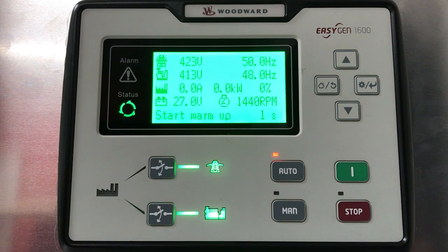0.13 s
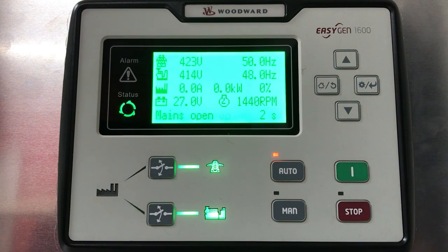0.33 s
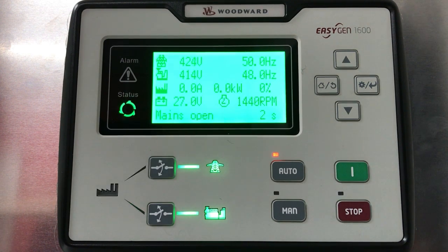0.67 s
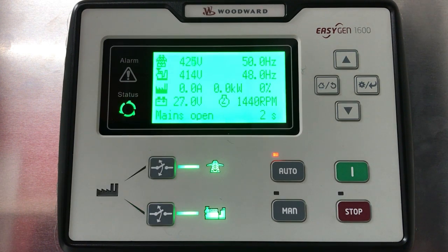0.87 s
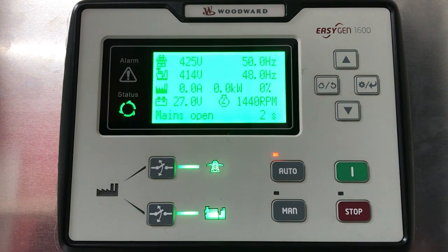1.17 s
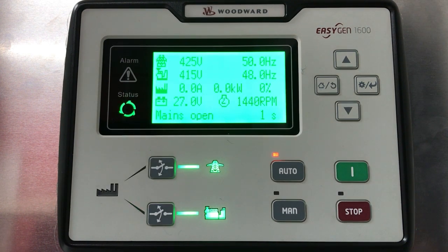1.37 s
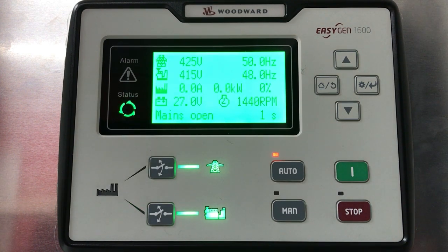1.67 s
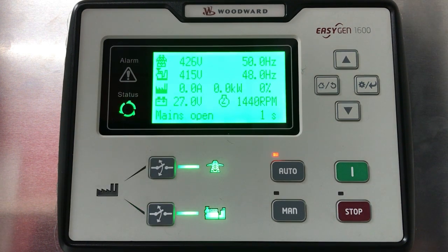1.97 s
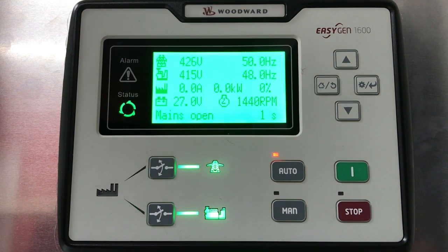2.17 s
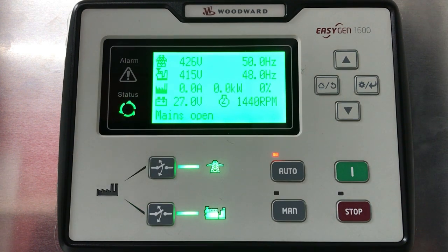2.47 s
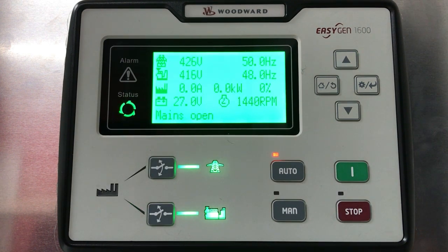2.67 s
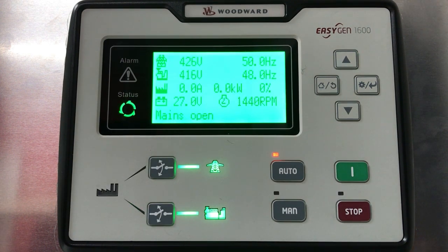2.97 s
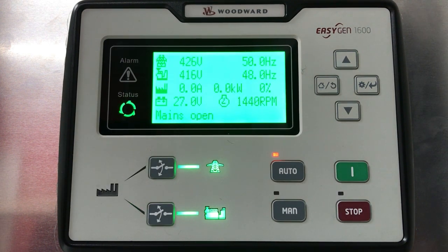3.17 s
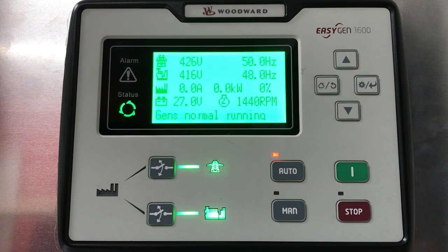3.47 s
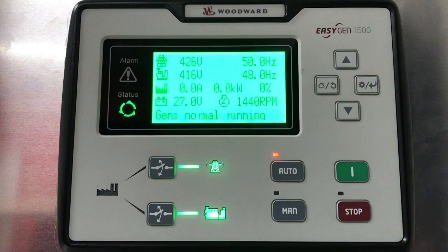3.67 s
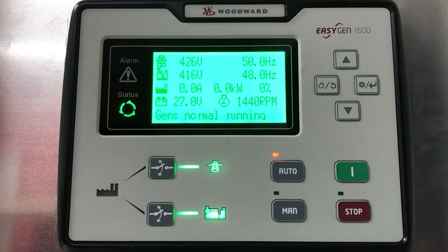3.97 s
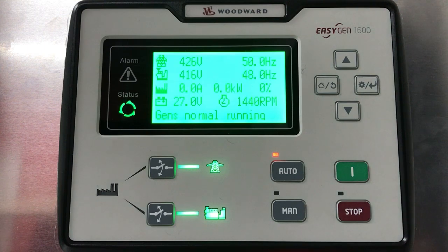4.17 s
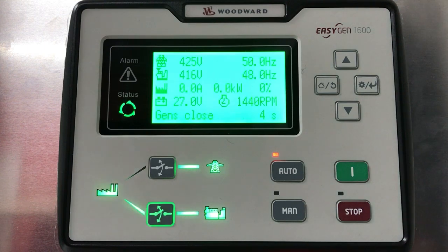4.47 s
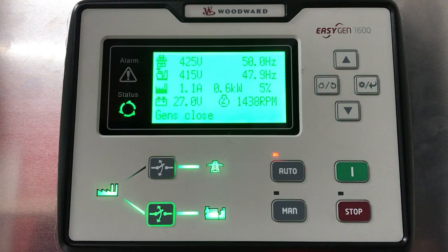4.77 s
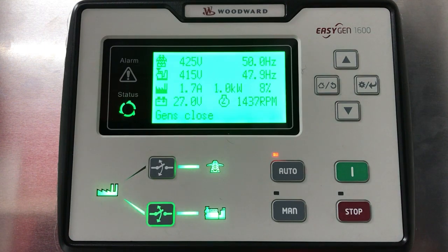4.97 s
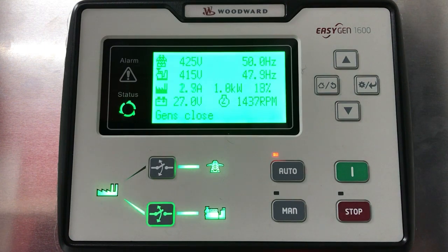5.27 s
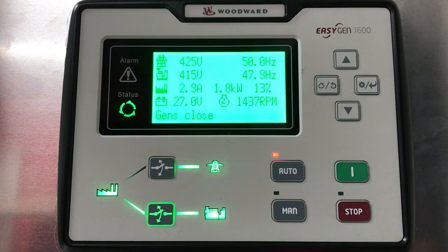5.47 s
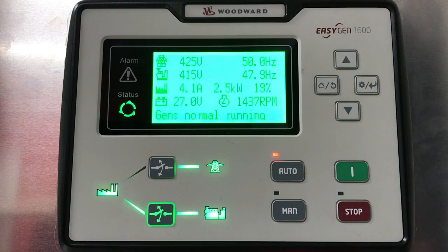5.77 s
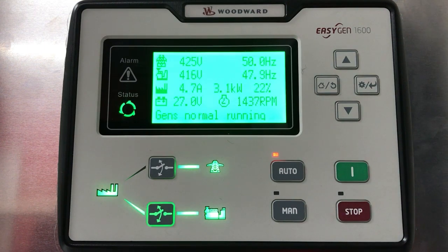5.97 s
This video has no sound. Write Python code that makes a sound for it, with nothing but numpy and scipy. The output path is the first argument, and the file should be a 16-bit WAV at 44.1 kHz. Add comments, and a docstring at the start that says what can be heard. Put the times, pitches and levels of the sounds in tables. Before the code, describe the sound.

Indoors at a test stand, a breaker opens immediately with a quick, rattling cluster of knocks, the loudest event, leaving a low steel-cabinet boom. Close relays tick singly and a contactor releases dully around three seconds, then clacks sharply twice after four. Underneath, generator hum throbs and slowly swells until load comes on, then smooths out. Fan noise and faint whines stay steady; the microphone adds slight hiss.

```python
"""A breaker on an indoor test stand drops out with a clunk: bursts of contact noise excite its damped modes and
low cabinet tones swell and die. A contactor clacks and relays tick by the same modal synthesis.
A generator set hums in sines at the orders of its shaft, which slows and smooths when it takes load.
Steady sines of mains, fan and machines stand over filtered ventilation noise. Diffuse echoes of a steel
housing and a hard room follow every blow."""
import sys
import numpy as np
from scipy import signal
from scipy.fft import rfft, irfft
from scipy.io import wavfile
from scipy.ndimage import uniform_filter1d

SR = 44100
rng = np.random.default_rng(int(sys.argv[2]) if len(sys.argv) > 2 else 0)


def waveform_to_disk(signal):
    """Save audio, clipped to [-1, 1], as 16-bit WAV at the path in sys.argv[1]."""
    frames = np.transpose(np.atleast_2d(signal))
    scaled = np.clip(frames, -1, 1) * 32767
    samples = np.round(scaled).astype(np.int16)
    wavfile.write(sys.argv[1], SR, samples)


def boost_factor(decibels):
    """Convert a level in decibels to a linear amplitude factor."""
    exponent = np.asarray(decibels, float) / 20
    return 10 ** exponent


N = 269451
T = np.arange(N) / SR  # time [s]

# In all blow tables the level is 3 dB above the greatest 3 ms rms; thump and knock are relative to 2.5-5 kHz.
# In all mode tables the level is that of the energy, before a small random spread.

# Blows of the opening breaker: t/s, level/dB, rattle fade/s, thump level/dB, knock level/dB
BREAKER_BLOWS = [(.004, -48, 0.056, -4, -17), (.012, -45, 0.0053, 2, 4), (.0475, -34.5, 0.0049, -3, -9),
                 (.054, -31, 0.0035, -7.5, 5), (.060, -30.5, 0.0088, 4, -3), (.1065, -39, 0.0067, 21, 10)]
# Damped modes of the breaker: f/Hz, level/dB, T60/s
BREAKER_MODES = [(463, -2.5, 0.041), (670, -3.5, 0.015), (895, -11, 0.02), (1256, 4, 0.0073),
                 (2025, 4, 0.0042), (3050, -2.5, 0.0022), (3950, -5, 0.0076), (4500, -16, 0.0087),
                 (6850, -0.5, 0.012)]
# Contact of the breaker: rattle rise/s, treble level/dB, treble loss per thump level [dB/dB]
BREAKER_CONTACT = (0.0033, -13, 0.53)


def breaker():
    """Modal excitation: a train of impacts sets the breaker ringing in its damped modes."""
    return blows(BREAKER_BLOWS, BREAKER_MODES, BREAKER_CONTACT, crack_db=2.7, uneven_db=4.5, scrape_db=-6)


def blows(events, modes, contact, crack_db, uneven_db, scrape_db):
    """Source-filter principle: a noisy contact force, growing from a faint scrape, drives modes and a dry crack."""
    out, size = np.zeros(N), 8192
    t, hz = T[:size], np.fft.rfftfreq(2 * size, 1 / SR)
    mode_hz, mode_db, t60 = np.transpose(modes)[:, :, None]
    rise, bright_db, dulling = contact
    for start_s, level_db, fade, thump_db, knock_db in events:
        # no two blows land alike: the modes shift a little in pitch and share
        detune, share = rng.standard_normal((2, len(modes), 1))
        shifted_hz = mode_hz * (1 + 0.008 * detune)
        gain = boost_factor(mode_db + 2.5 * share - 60 * t / t60) / np.sqrt(t60)
        ring = np.sum(gain * np.sin(2 * np.pi * shifted_hz * t), axis=0)
        ring = ring / np.sqrt(np.sum(ring ** 2))
        body = rfft(ring, 2 * size) + boost_factor(crack_db)  # the flat part is the crack

        scrape = boost_factor(scrape_db * (1.0 - (t / rise) ** 2))
        envelope = np.where(t < rise, scrape, np.exp((rise - t) / fade))
        unevenness = boost_factor(uneven_db * rng.standard_normal(size))
        force = envelope * rng.standard_normal(size) * unevenness

        treble_db = bright_db - dulling * thump_db
        tilt = [(150, thump_db - 20), (320, thump_db), (750, thump_db), (1400, knock_db), (2500, 0), (5000, 0),
                (8000, treble_db), (13000, treble_db), (16000, treble_db - 3)]
        hit = irfft(rfft(force, 2 * size) * body * boost_factor(across(tilt, hz)))[:size]
        peak = np.sqrt(np.max(uniform_filter1d(hit ** 2, size=128)) * 2)
        start = int(start_s * SR)
        out[start:start + size] += (hit * boost_factor(level_db) / peak)[:N - start]
    return out


def across(table, hz):
    """Logarithmic frequency scale: tabulated values are interpolated linearly against log frequency."""
    at, value = np.transpose(table)
    return np.interp(np.log(np.maximum(hz, 1)), np.log(at), value)


# Resonances of cabinet and floor, which take up the breaker's blow:
# f/Hz, start t/s, swell time constant/s, level/dB (before swell and shudder), T60/s
CABINET_MODES = [(267.4, .057, 0.0044, -25.5, 0.27), (247, 0.087, 0.019, -34.5, 0.74),
                 (212.7, .06, 0.0037, -33, 0.56), (186.4, 0.12, 0.0088, -33, 0.41),
                 (327.6, .06, 0.038, -38, 0.75), (108.3, .09, 0.023, -26, 0.74),
                 (99.2, 0.064, 0.055, -33, 0.7), (139, 0.048, 0.0063, -33.5, 0.37),
                 (76.6, 0.0557, 0.035, -38, 1), (48.1, 0.11, 0.044, -27, 0.85)]


def cabinet():
    """Resonance: low panel modes build up after the blow, shudder and decay exponentially."""
    out = 0
    for hz, start, swell, level_db, t60 in CABINET_MODES:
        t = np.maximum(T - start, 0)
        envelope = boost_factor(level_db - 60 * t / t60) * (1 - np.exp(-t / swell))
        shudder = boost_factor(1.7 * walk(22.4))
        out = out + envelope * shudder * np.sin(2 * np.pi * hz * t)
    return out


def walk(rate):
    """Band-limited fluctuation: random values held 1 / rate s and averaged twice; spread near 1."""
    hold = int(SR / rate)
    steps = np.repeat(rng.standard_normal(N // hold + 1), hold)
    return 1.3 * uniform_filter1d(uniform_filter1d(steps, hold), hold)[:N]


# Clacks of the contactor: t/s, level/dB, rattle fade/s, thump level/dB, knock level/dB
CONTACTOR_CLACKS = [(4.1073, -37, 0.0018, -1.5, 11.5), (4.1168, -39.5, .011, -2.5, -21),
                    (4.6343, -38.5, 0.0052, 11.5, 13.5), (4.6508, -43, .01, 1.5, -6)]
# Its slower and duller releases: t/s, level/dB, rattle fade/s, thump level/dB, knock level/dB
CONTACTOR_RELEASES = [(.1652, -40.5, 0.0019, -7, 9.5), (3.0298, -41, 0.0037, .5, 2),
                      (3.039, -52, 0.012, 5, 6)]
# Damped modes of the contactor: f/Hz, level/dB, T60/s
CONTACTOR_MODES = [(289, 5, 0.12), (375, 6.5, 0.15), (442, 3.5, 0.063), (554, -9.5, 0.054),
                   (700, 9.5, 0.053), (818, 7, 0.06), (1580, -25, .008), (1860, 1.5, 0.0044),
                   (2250, 5, 0.0062), (3200, -10, .005), (4280, 7.5, 0.0037), (6020, -5, 0.018),
                   (7200, 8.5, 0.0043), (12600, -27, 0.0032)]
# Contact in clack and in release: rattle rise/s, treble level/dB, treble loss per thump level [dB/dB]
CLACK_CONTACT = (0.0017, -1, 0.016)
RELEASE_CONTACT = (0.0038, -3, 0.23)


def contactor():
    """Modal excitation: clacks and duller releases ring the same set of damped modes."""
    clacks = blows(CONTACTOR_CLACKS, CONTACTOR_MODES, CLACK_CONTACT, 1.5, 2.5, -9)
    releases = blows(CONTACTOR_RELEASES, CONTACTOR_MODES, RELEASE_CONTACT, 1.5, 2.5, -9)
    return clacks + releases


# Ticks of the heavy and the light relay: t/s, level/dB, rattle fade/s, thump level/dB, knock level/dB
HEAVY_RELAY_TICKS = [(.6645, -40, 0.0038, -7, -3), (2.1043, -38, 0.0035, -8.5, -7),
                     (5.7243, -38, .0027, -10, 0)]
LIGHT_RELAY_TICKS = [(.1325, -42.5, 0.0041, -9, -1), (4.2118, -42.5, 0.0069, -3, 2),
                     (4.4725, -45.5, .006, -7, 4), (4.4922, -46, 0.0094, -16, 9)]
# Their damped modes: f/Hz, level/dB, T60/s
HEAVY_RELAY_MODES = [(1120, 4.5, 0.004), (2326, -4.5, 0.017), (3140, -11, 0.011), (4070, -4.5, 0.017),
                     (4720, -7, 0.0021), (5640, -26, .003), (8800, -6.5, 0.0022), (11600, -8, 0.013)]
LIGHT_RELAY_MODES = [(4080, -5, 0.027), (4250, 1, 0.035), (5440, -9, 0.003), (6960, -7, 0.0042),
                     (8800, -28, 0.0056), (10400, -5, 0.006), (11430, 2.5, 0.0043), (12150, -8, 0.19),
                     (13100, 1, .004), (15000, -4, .003)]
# Their contact: rattle rise/s, treble level/dB, treble loss per thump level [dB/dB]
HEAVY_RELAY_CONTACT = (.0036, -7.5, 0.01)
LIGHT_RELAY_CONTACT = (0.00074, -2, .01)


def relays():
    """Modal excitation: brief contact noise rings the small parts of a heavy and a light relay."""
    heavy = blows(HEAVY_RELAY_TICKS, HEAVY_RELAY_MODES, HEAVY_RELAY_CONTACT, 3, 3, -14)
    light = blows(LIGHT_RELAY_TICKS, LIGHT_RELAY_MODES, LIGHT_RELAY_CONTACT, -5, 2.5, -15)
    return heavy + light


# Shaft frequency of the generator set: f/Hz without load, f/Hz with load
SHAFT_SPEED = (24.02, 23.97)
# The load comes on: start t/s, end t/s
LOAD_TIMES = (4.235, 4.48)
# Shaft orders: order, rms level/dB without load, rms level/dB with load (orders 2 and 3 before the throb)
SHAFT_ORDERS = [(1, -77, -91), (2, -57, -65), (3, -49, -68), (6, -60.5, -61), (8, -63.5, -69.5),
                (14, -63, -67.5), (16, -73.5, -69.5), (18, -88, -74.5), (27, -74.5, -75), (29, -110, -79),
                (30, -86.5, -71.5), (32, -85, -77)]


def generator():
    """Order synthesis: sines at multiples of the shaft frequency change level and slow as the load comes on."""
    load = np.interp(T, LOAD_TIMES, (0, 1))
    shaft_hz = SHAFT_SPEED[0] + (SHAFT_SPEED[1] - SHAFT_SPEED[0]) * load
    # the deep throb of orders 2 and 3 grows by 1.49 dB/s until the load starts to come on
    throb_db = -4 + 1.49 * np.minimum(T, LOAD_TIMES[0])
    out = 0
    for order, idle_db, loaded_db in SHAFT_ORDERS:
        level_db = idle_db + (loaded_db - idle_db) * load
        if order in (2, 3):
            level_db = level_db + throb_db
        out = out + tone(order * shaft_hz, level_db, waver_db=1.3)
    return out


def tone(hz, level_db, waver_db):
    """Amplitude modulation: a sine, its phase the integral of frequency, wavers slowly in level."""
    phase = 2 * np.pi * (np.cumsum(hz + 0 * T) / SR + rng.random())
    return np.sqrt(2) * boost_factor(level_db + waver_db * walk(3.14)) * np.sin(phase)


# Steady tones of fan, mains and other machines: f/Hz
STEADY_HZ = [59.35, 100.1, 200.2, 355.6, 882.5, 1022.6, 1167, 1300.8, 1460.9, 1494, 1753.1, 2045.3, 2761]
# Mean levels of those tones: rms level/dB
STEADY_DB = [-49, -60.5, -63, -78, -70.5, -73.5, -78.5, -78, -73, -77.5, -77.5, -78.5, -87.5]


def steady_tones():
    """Additive synthesis: hum and whines are a sum of sines at fixed frequencies."""
    return sum(tone(hz, level_db, waver_db=0.94) for hz, level_db in zip(STEADY_HZ, STEADY_DB))


# Ventilation noise: f/Hz, spectral density level/dB per Hz
AIR_SPECTRUM = [(20, -89), (45, -71), (80, -73.5), (150, -80.5), (260, -85), (360, -87), (480, -97),
                (670, -92), (790, -96.5), (930, -85.5), (1150, -95.5), (1500, -97.5), (2300, -106),
                (4400, -113), (5000, -124), (16000, -140)]


def air():
    """Spectral shaping: broadband noise of fans and ducts breathes a little in level."""
    return boost_factor(0.51 * walk(2.61)) * coloured(AIR_SPECTRUM)


def coloured(spectrum):
    """Linear filtering: white noise of unit density takes on the given density in dB per Hz."""
    white = rng.standard_normal(N) * np.sqrt(SR / 2)
    gain = boost_factor(across(spectrum, np.fft.rfftfreq(N, 1 / SR)))
    return irfft(rfft(white) * gain, N)


# Reverberation of the steel housing: f/Hz, T60/s
HOUSING_DECAY = [(300, 0.18), (3000, 0.072), (12000, 0.066)]


def housing():
    """Reverberation of a small enclosure: echoes in the steel die long before those of the room."""
    return echoes(HOUSING_DECAY, build_s=0.0028)


# Reverberation of the hard room: f/Hz, T60/s
ROOM_DECAY = [(100, 1.0), (1000, 0.88), (4000, 0.54), (12000, 0.34)]


def room():
    """Room reverberation: diffuse echoes build up gradually and die slowly."""
    return echoes(ROOM_DECAY, build_s=0.023)


def echoes(t60, build_s):
    """Diffuse-field decay: noise bands die exponentially, the treble faster, in a response of unit energy."""
    t, tail = T[:SR], 0
    for hz in 63 * np.sqrt(2) ** np.arange(17):  # half-octave bands
        band = signal.butter(1, (hz / 1.19, hz * 1.19), "bandpass", fs=SR, output="sos")
        noise = signal.sosfilt(band, rng.standard_normal(SR))
        tail = tail + noise * boost_factor(-60 * t / across(t60, hz))
    tail = tail * (1 - np.exp(-t / build_s))
    return tail / np.sqrt(np.sum(tail ** 2))


def scene():
    """Superposition: relays close by and the breaker further off, so with more room, over hum and air."""
    housing_echo, room_echo = housing(), room()
    heard = cabinet() + generator() + steady_tones() + air()
    # source, housing echo level/dB, room echo level/dB
    for part, housing_db, room_db in ((breaker(), -8, -6), (contactor(), -8, -13), (relays(), -10.5, -19)):
        response = boost_factor(housing_db) * housing_echo + boost_factor(room_db) * room_echo
        heard = heard + part + signal.fftconvolve(part, response)[:N]
    return heard[None]


# Microphone hiss before the roll-off: f/Hz, spectral density level/dB per Hz
HISS_SPECTRUM = [(1000, -125), (4000, -119), (6500, -118), (8000, -121), (10500, -124), (12500, -121),
                 (15500, -121)]


def microphone(dry):
    """Additive noise and low-pass filtering: faint hiss joins the sound and the very top rolls off."""
    # 50 dB down from 16.5 kHz
    roll_off = signal.cheby2(10, 50, 16500, fs=SR, output="sos")
    return signal.sosfilt(roll_off, dry + coloured(HISS_SPECTRUM))


def low_pass(x):
    """Removes everything above the highest recorded frequency."""
    return signal.sosfilt(signal.butter(12, 16360, fs=SR, output="sos"), x)


def record(dry):
    """Signal chain: the scene passes through the microphone to the finished mix."""
    mix = microphone(dry)
    return low_pass(mix)


dry = scene()
out = record(dry)
waveform_to_disk(out)
```